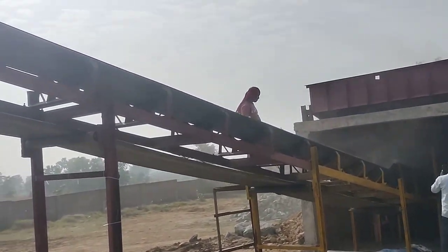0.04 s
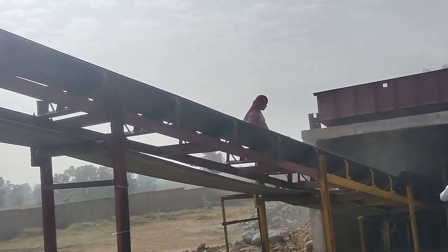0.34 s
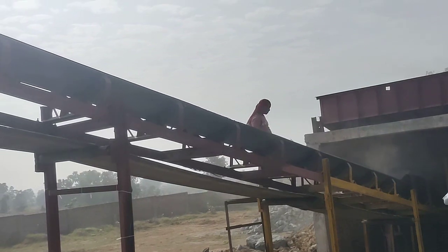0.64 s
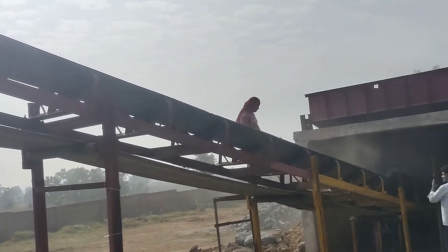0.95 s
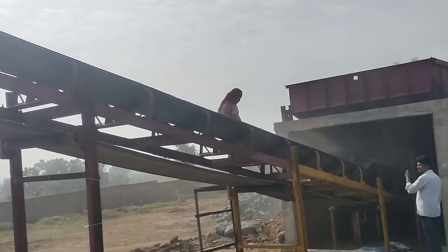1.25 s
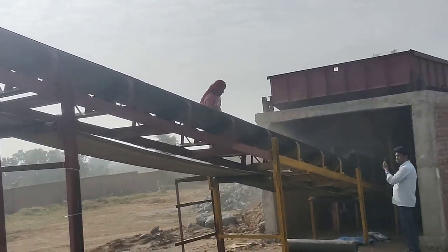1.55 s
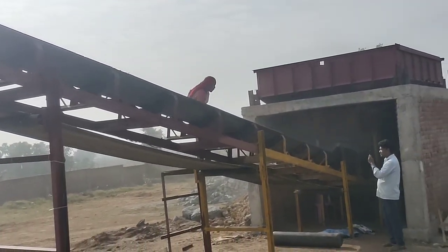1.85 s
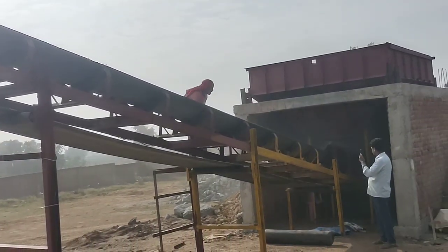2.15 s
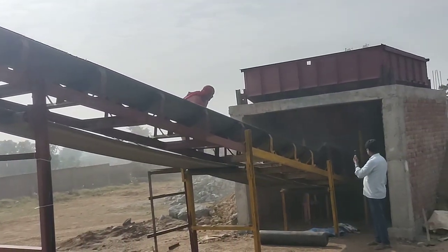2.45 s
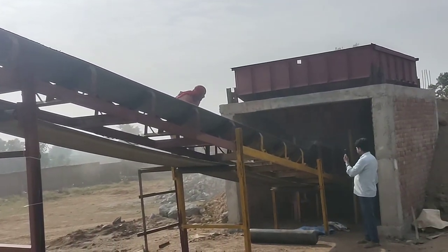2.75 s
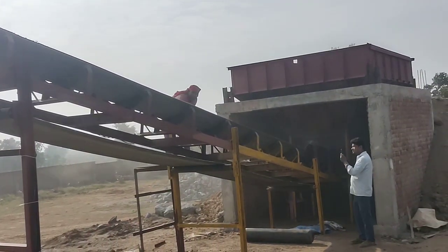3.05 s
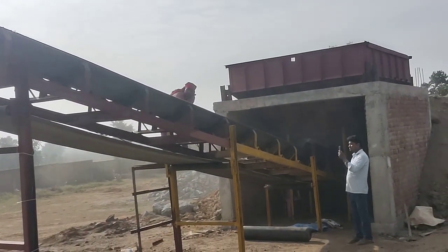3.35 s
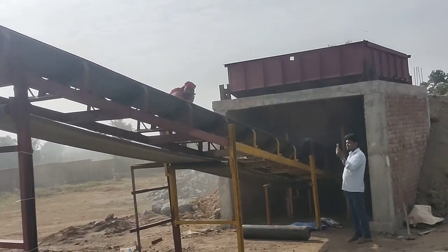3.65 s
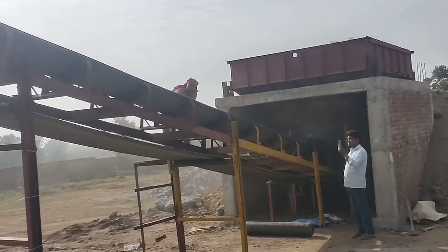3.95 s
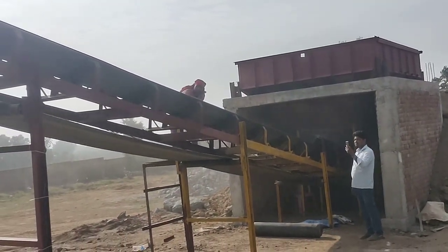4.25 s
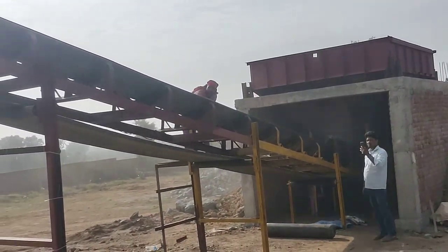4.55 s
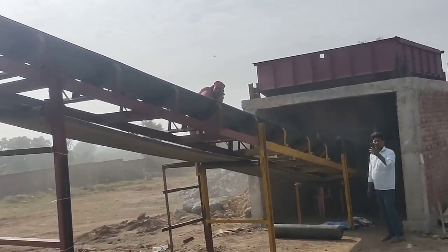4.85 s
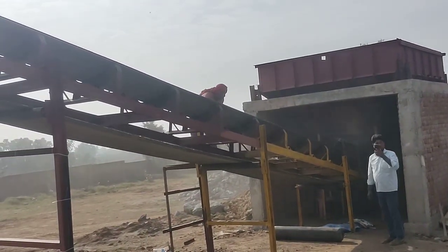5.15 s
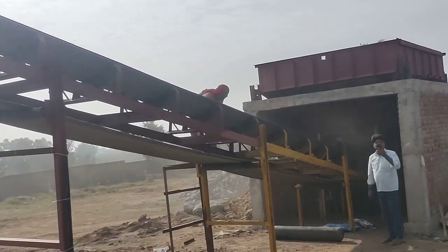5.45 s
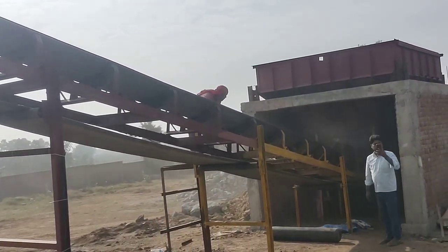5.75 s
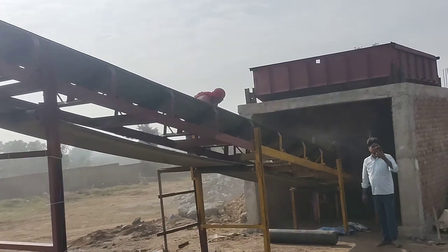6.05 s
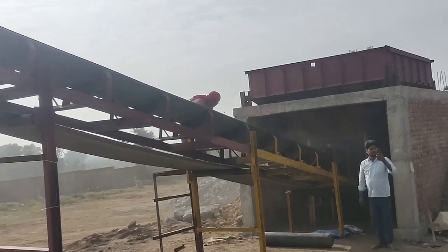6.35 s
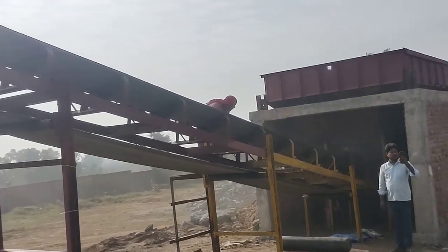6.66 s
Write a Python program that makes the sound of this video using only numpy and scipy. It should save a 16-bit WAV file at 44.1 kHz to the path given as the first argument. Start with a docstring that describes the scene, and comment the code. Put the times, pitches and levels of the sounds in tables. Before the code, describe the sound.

An outdoor stone crushing plant runs with a steady drive hum, distant machine rumble and grit hissing off a conveyor belt. Under a steel hopper, a tray strokes nearly three times a second. Each push sends stones thudding, tumbling and scraping over steel, followed by a thin, high roller squeak. A few heavier spills crunch down, and a metallic ring grows as the microphone turns toward it. A concrete bay adds a short echo.

```python
"""A stone crushing plant outdoors. From the start a drive hums, far machines rumble and grit hisses off
a belt. A tray under a steel hopper strokes back and forth 2.8 times a second. Each push makes stones
thud, tumble, grind, squeal and scrape over the steel. Then, as the tray turns round, they come to rest
and a dry roller squeaks. At about 1.5 seconds the first heavy spill crunches down, and a ring near
1.4 kHz comes through louder as the microphone turns toward it. A concrete bay adds its echo."""
import sys
import numpy as np
from scipy import signal
from scipy.fft import rfft, irfft, next_fast_len
from scipy.io import wavfile
from scipy.ndimage import uniform_filter1d

SR = 44100
rng = np.random.default_rng(int(sys.argv[2]) if len(sys.argv) > 2 else 0)


def digitize_waveform(pressure):
    """Quantize a signal to 16-bit integers and store it at the path in sys.argv[1].

    Rows of a 2-D input are taken as channels; values are limited to [-1, 1].
    """
    field = np.atleast_2d(pressure).T
    bounded = np.clip(field, -1, 1)
    quanta = np.round(bounded * 32767).astype(np.int16)
    wavfile.write(sys.argv[1], SR, quanta)


N = 295911
TIME = np.arange(N) / SR

# tones of the drive's hum: multiple of the shaft rate, level/dB, share that follows the load
HUM_TONES = [(3, -34, 0.3), (6, -40.5, 0.4), (8, -38, 0.44), (9, -38, 0.64), (10, -48.5, 0.3),
             (11, -61.5, 0.3), (13, -40.5, 0.9), (15, -48, 0.9), (18, -40.5, 1)]
# tone colour of the far machines: f/Hz, level/dB
FAR_SPECTRUM = [(20, -9), (45, 0), (90, 30), (200, 21), (480, -19), (900, -17), (1700, 20), (3000, -35),
                (6000, -18), (15000, -53)]
# tone colour of sliding grit: f/Hz, level/dB
GRIT_SPECTRUM = [(3000, -49), (4500, -4), (5400, 12), (5850, -5.5), (6300, 12), (6900, 6.5), (7600, 9.5),
                 (8500, 0), (9600, -0.5), (11500, 2.5), (13500, 6.5), (15500, 3)]
# pushes of the tray: t/s, length/s, lull before it/dB, thudding/dB, tumbling/dB, grinding/dB
TRAY_PUSHES = [(0.0, 0.19, -8.0, -29.5, -29.5, -22.5), (0.333, 0.21, -5.5, -28, -30, -21.5),
               (0.689, 0.22, -3, -32, -29, -22.5), (1.044, 0.22, -8, -29.0, -28.5, -24.5),
               (1.395, 0.23, -5.5, -27.5, -30.5, -28), (1.754, 0.21, -5, -29, -30, -27),
               (2.111, 0.23, -6.5, -29.5, -26.5, -26.5), (2.496, 0.19, -5.5, -26, -29.5, -24),
               (2.822, 0.24, -5, -31.5, -26.5, -24), (3.176, 0.23, -4, -27, -28.5, -24.5),
               (3.557, 0.219, -4.5, -27, -25.0, -23.5), (3.888, 0.236, -3, -32, -29, -22.5),
               (4.281, 0.216, -3.5, -27, -28.0, -23), (4.639, 0.199, -7.5, -27.5, -25.5, -23),
               (4.934, 0.25, -4.5, -27, -30, -23.5), (5.339, 0.24, -3, -31.0, -30.5, -24.5),
               (5.702, 0.21, -6, -25.5, -24.5, -23.0), (6.055, 0.33, -4.5, -28.5, -28, -21.5),
               (6.44, 0.34, -5.0, -25.5, -27.5, -22.5)]
# modes (the notes that a part rings at when hit): f/Hz, width/Hz, level/dB
HOPPER_MODES = [(119, 104, -7), (176, 140, -1.5), (256, 69, -0.5), (313, 21.5, -7), (366, 21.3, -1.5)]
CHUTE_MODES = [(530.5, 148, -11), (678, 62, -8), (771, 67, -5), (823, 53, -1), (944, 70.3, 2.5),
               (1019, 58, -6.5), (1069, 55, -19)]
TRAY_MODES = [(1610, 20.7, 2.5), (1677, 40.5, -1), (1750, 182, -4), (2044, 54, -6.5), (2233, 99, -0.5),
              (2384, 51, -8.5), (2590, 105, -2), (2755, 18, -8.5)]
LIP_MODES = [(1318, 51, -4), (1382, 21.5, -1.5), (1547, 124, -1)]
LINER_MODES = [(2960, 62, 3.5), (3353, 7.4, 4.5), (3448, 96, 10), (3532, 140, 4.5), (3840, 94, 1),
               (4030, 142, 3.5), (4210, 100, 4), (4456, 117, 2), (4777, 115, -17.5), (5005, 193, 0.5)]
CHIP_MODES = [(6940, 520, 1), (10020, 1700, 1), (12600, 2200, -9.5)]
ROLLER_MODES = [(4844, 7.4, 9), (4727, 13, 11), (4850, 41, -2.5), (10847, 24, -13.5)]
# the lip's ring, next to the grinding, comes through louder as the microphone turns to it: t/s, level/dB
MIC_FACING = [(0, -14.5), (1.1, -16), (1.8, -1.5), (3.7, -4.5), (6.7, -5.5)]
# heavy spills of stone: middle t/s, length/s, level/dB
STONE_SPILLS = [(1.478, 0.13, -22.5), (1.798, 0.1, -24), (2.157, 0.057, -50), (2.897, .1, -29.5),
                (4.752, 0.1, -29), (4.993, 0.087, -22.5), (5.738, 0.083, -42)]
# single stones squealing on the steel: middle t/s, f/Hz, level/dB, length/s
STONE_SQUEALS = [(.04, 2857, -23, 0.3), (.35, 2813, -22, .071), (.4, 13500, -20.5, 0.019),
                 (.58, 980, -23.5, 0.084), (.76, 843, -23, .17), (1.13, 3480, -28, .09),
                 (1.74, 1366, -26, 0.073), (1.81, 2590, -20, .063), (2.15, 929, -27.5, .14),
                 (2.28, 842, -25, 0.19), (2.55, 3574, -24, 0.11), (2.95, 2595, -22, .057),
                 (3.19, 2576, -19.5, 0.035), (3.27, 3250, -23, 0.078), (3.42, 2574, -22.5, 0.067),
                 (3.77, 1356, -19, 0.049), (4.33, 12600, -28, 0.053), (4.54, 12700, -21, .025),
                 (4.8, 2570, -23, 0.064), (4.84, 3797, -18, 0.036), (5.06, 3450, -27, 0.034),
                 (5.226, 8780, -20.5, 0.037), (5.73, 13300, -18.5, 0.03), (5.74, 4150, -20.5, 0.025),
                 (6.1, 13700, -21, .04), (6.44, 3510, -22, 0.076)]
# the load scraping over the steel liner at full speed: middle t/s, length/s, level/dB
LINER_SCRAPES = [(0.099, 0.081, -23.5), (0.463, 0.152, -26.0), (0.783, 0.134, -24.0), (1.14, 0.133, -22.0),
                 (1.532, 0.066, -26.0), (1.859, 0.089, -20.5), (2.206, 0.109, -21.5), (2.57, 0.128, -22.0),
                 (2.928, 0.141, -22.5), (3.284, 0.106, -21.5), (3.665, 0.073, -25.5), (4.023, 0.138, -24.5),
                 (4.333, 0.178, -22.5), (4.715, 0.074, -26.0), (5.064, 0.095, -22.0), (5.407, 0.12, -21.5),
                 (5.779, 0.104, -24.0), (6.145, 0.081, -21.5), (6.3, 0.06, -23.5), (6.467, 0.159, -21.5),
                 (6.7, 0.07, -27)]
# the roller's whistle catching before the turn: middle t/s, f/Hz, level/dB, length/s
EARLY_CATCHES = [(.149, 11120, -17.5, 0.021), (.504, 10620, -17.5, 0.013)]
# turns of the tray, each with a squeak:
# t/s, length/s, start f/Hz, end f/Hz, whistle/dB, chirp before/dB, chirp after/dB, jolt/dB
TRAY_TURNS = [(0.197, 0.067, 10960, 10950, -13, -18.5, -26, -50),
              (0.543, 0.074, 10970, 11160, -15.5, -27, -33.5, -31),
              (0.905, .082, 11240, 11030, -11, -17.5, -29, -32.5),
              (1.272, 0.055, 10980, 11160, -9.5, -24.5, -26.5, -50),
              (1.614, 0.066, 11060, 11000, -13.5, -14.5, -28.5, -33),
              (1.973, 0.077, 10950, 11540, -12.5, -19, -33, -36),
              (2.333, 0.06, 10730, 11480, -14, -17, -26, -31),
              (2.687, 0.068, 10940, 11240, -16, -23.5, -44, -34),
              (3.04, 0.072, 11030, 11130, -14.5, -47, -42, -52),
              (3.41, 0.059, 10900, 10850, -15, -53, -31.5, -58),
              (3.762, 0.064, 10800, 10860, -25, -20.5, -34, -50),
              (4.109, 0.077, 10900, 11130, -20, -47, -39.5, -37),
              (4.479, 0.06, 10900, 12900, -14, -51, -37.5, -57),
              (4.846, 0.031, 10800, 10400, -16, -38, -39, -32),
              (5.175, 0.083, 11020, 10830, -14.5, -55, -29, -33.5),
              (5.535, 0.073, 10860, 11400, -16, -37, -47, -34),
              (5.907, 0.048, 11130, 12100, -13, -55, -34, -34.5)]

SHAFT_HZ, MOTOR_HZ, TOP_HZ = 20.35, 39, 15750
JOLT_DELAY_S = 0.096  # the load jolts on the liner this long after a turn


def undb(db):
    """Turn decibels into a number to multiply by."""
    return np.exp(np.asarray(db) * np.log(10) / 20)


def unit(x):
    """Scale to an average power of 1."""
    return x / np.sqrt(np.mean(x ** 2) + 1e-18)


def even(x, seconds):
    """Hold the average power at 1 over the given time, keeping the finer grain."""
    return x / np.sqrt(uniform_filter1d(x ** 2, int(seconds * SR)) + 1e-9)


def walk(rate):
    """A smooth random wobble of size 1 that changes about rate times a second."""
    step = max(int(SR / rate), 2)
    held = np.repeat(rng.standard_normal(N // step + 2), step)
    return unit(uniform_filter1d(held, step)[step // 2:step // 2 + N])


def lumpy(rate):
    """A random wobble kept between -1 and 1."""
    return np.tanh(walk(rate))


def curve(rows):
    """Join (time, value) points with straight lines."""
    return np.interp(TIME, *np.transpose(rows))


def bump(t, width):
    """A smooth swell around t = 0."""
    return np.exp(-(t / width) ** 2)


def phase(hz):
    """The running angle, in radians, of a tone whose pitch moves."""
    return 2 * np.pi * np.cumsum(hz) / SR


def colour(x, spectrum):
    """Make each frequency louder or softer, as the spectrum says."""
    hz, db = np.transpose(spectrum)
    size = next_fast_len(N + 4096)
    f = np.fft.rfftfreq(size, 1 / SR) + 1
    gain = undb(np.interp(np.log(f), np.log(hz), db))
    return irfft(rfft(x, size) * gain, size)[:N]


def band(x, low_hz, high_hz):
    """Keep the sound between two frequencies."""
    return signal.sosfilt(signal.butter(3, [low_hz, high_hz], "band", fs=SR, output="sos"), x + 1e-18)


def bay(x, fade_s, echo_db):
    """Add the dense echo of the concrete walls and the steel frame."""
    t = TIME[:SR // 2]
    tail = rng.standard_normal(len(t)) * undb(-60 * t / fade_s) * (t > .003)
    return x + undb(echo_db) * signal.fftconvolve(x, tail / np.linalg.norm(tail))[:N]


def contacts(rate, spread_db):
    """About rate random stone hits a second, many light and a few hard."""
    hit = rng.random(N) < rate / SR
    size = np.minimum(rng.standard_exponential(N), 4)
    return hit * undb(spread_db * size)


def stroke_clock():
    """Seconds since the tray last turned round."""
    turns = np.array(TRAY_TURNS)[:, 0]
    gap_s = 0.288  # spaces one more turn before the listed ones and two after
    turns = np.r_[turns[0] - gap_s, turns, turns[-1] + gap_s * np.arange(1, 3)]
    return TIME - turns[np.searchsorted(turns, TIME, side="right") - 1]


def drive(load_db):
    """The motor and shaft hum; the upper tones are frame buzz that swells with the load."""
    angle = phase(SHAFT_HZ * (1 + 0.0016 * walk(1.953)))
    hum = undb(-52) * np.sin(2 * np.pi * MOTOR_HZ * TIME)
    for multiple, db, share in HUM_TONES:
        gain = undb(db + share * (load_db + 1.8 * walk(18)))
        hum += gain * np.sin(multiple * angle + 2 * np.pi * rng.random() + 0.57 * share * walk(9))
    return np.sqrt(2) * hum


def far_machines():
    """Machines further off make a gently wavering rumble."""
    return undb(-43 + walk(2.3)) * unit(colour(rng.standard_normal(N), FAR_SPECTRUM))


def belt_grit(clock):
    """Grit pours evenly off the belt: a steady fine hiss that dips briefly at each squeak."""
    dip = bump(clock - .03, .035)
    grains = contacts(9000, 1.8) * rng.standard_normal(N)
    return undb(-35.5 - 3.4 * dip + 0.28 * walk(23)) * unit(colour(grains, GRIT_SPECTRUM))


def pushed(push_db, lull_scale):
    """Level in dB: rises out of a lull, holds through each push, settles into the next lull."""
    start, length, lull_db = np.array(TRAY_PUSHES).T[:3]
    stop = start + length
    before = lull_scale * np.minimum(lull_db, 0)
    after = np.r_[before[1:], before[-1]]
    rise_s, settle_s = .05, 0.032
    times = np.c_[start - rise_s, start, stop, stop + settle_s].ravel()
    levels = np.c_[push_db + before, push_db, push_db, push_db + after].ravel()
    return np.interp(TIME, np.maximum.accumulate(times), levels)


def load_levels(clock):
    """Thudding, tumbling and grinding in dB: stones come in lumps and lie stillest just after a turn."""
    start, _, _, thud_db, tumble_db, grind_db = np.array(TRAY_PUSHES).T
    surge = sum(bump(TIME - s - 0.022, 0.012) for s in start)  # the first to topple tumble hardest
    surge_db = 2.5 * (surge - surge.mean())
    still_db = -3.5 * bump(clock - 0.085, 0.025)
    lumps = lumpy(22)
    return (pushed(thud_db, lull_scale=2.13) + still_db + 2.25 * lumps + 2.6 * lumpy(35),
            pushed(tumble_db, lull_scale=1.45) + still_db + surge_db + lumps + lumpy(20),
            pushed(grind_db, lull_scale=1) + still_db / 2 + 1.2 * lumps + 1.9 * lumpy(9))


def ring(blows, modes, swell_db):
    """A plate rings: each blow lands somewhere else, and each mode swells and fades as stones shift."""
    out, hits = 0, np.flatnonzero(blows)
    shift_times = np.arange(0, 7, .06)
    for hz, width, db in modes:
        swell = np.interp(TIME[hits], shift_times, rng.standard_normal(len(shift_times)))
        landing = rng.standard_normal(4096)[hits % 4096]
        force = np.full(N, 1e-18)
        force[hits] = blows[hits] * landing * undb(swell_db * swell)
        peak = np.concatenate(signal.iirpeak(hz, hz / (1.81 * width), fs=SR))
        out = out + undb(db) * unit(signal.sosfilt([peak, peak], force))
    return unit(out)


def slips(modes, count, spread_db, decay_s, scatter):
    """Short sinking tones: a stone chatters near one of the plate's modes, then slips free."""
    t = TIME[:SR // 8].astype(np.float32)
    shape = (1 - np.exp(-t / 0.00065)) * np.exp(-t / decay_s) * (1 - t / t[-1])
    sweep = 2 * np.pi * (t - 0.117 * t ** 2)
    when, which = rng.random((count, 2)).T
    detune, size = rng.standard_normal((count, 2)).T
    hz, width, db = np.array(modes, float)[(which * len(modes)).astype(int)].T
    pitches = hz + scatter * width * detune
    gains = undb(db + spread_db * np.minimum(size, 2))
    out = np.zeros(N + len(t), np.float32)
    for at, pitch, gain in zip((when * N).astype(int), pitches, gains):
        out[at:at + len(t)] += float(gain) * shape * np.sin(float(pitch) * sweep)
    return unit(out[:N])


def stones(thud_db, tumble_db, grind_db):
    """Big stones thud in the shaking hopper; smaller ones tumble in the chute and grind on the tray."""
    shaft_angle = 2 * np.pi * SHAFT_HZ * TIME
    shake = 1 + 0.075 * np.sin(shaft_angle) + 1.36 * np.sin(2 * shaft_angle)
    thud = band(ring(shake * contacts(400, 4.8), HOPPER_MODES, swell_db=3.3), 112, 406)
    tumble = ring(contacts(900, 4.3), CHUTE_MODES, swell_db=9.2)
    tumble += undb(-6) * slips(CHUTE_MODES, count=400, spread_db=7, decay_s=0.11, scatter=0.556)
    grind = ring(contacts(1100, 4), TRAY_MODES, swell_db=8.2)
    grind += undb(-4) * slips(TRAY_MODES, count=750, spread_db=2, decay_s=0.23, scatter=0.543)
    lip = undb(curve(MIC_FACING)) * ring(contacts(900, 2.75), LIP_MODES, swell_db=0.97)
    return (undb(thud_db - 2.5) * even(thud, 0.059)
            + undb(tumble_db + 0.5) * even(tumble, 0.081)
            + undb(grind_db - 1) * (even(grind, 0.083) + lip))


def crunch(tumble_db):
    """Stones crack together: lightly as they tumble, hard in a spill, hardly at all in the lulls."""
    hits = contacts(1100, 3.9) * rng.standard_normal(N)
    cracks = even(band(bay(hits, fade_s=0.083, echo_db=1.1), 464, 1620), 0.047)
    spills = sum(undb(db) * bump(TIME - s, length / 2) for s, length, db in STONE_SPILLS)
    facing_db = curve(MIC_FACING)
    lull_db = np.minimum(tumble_db - np.median(tumble_db), 0)
    light = undb(-12.5 + tumble_db + lull_db + 0.52 * (facing_db - facing_db.mean()))
    return np.hypot(light, spills) * cracks


def chirps(rows, sink, rough, overtone_db):
    """Tones made by sticking and slipping; sink is the share of its pitch that one loses per second."""
    out, jitter = np.zeros(N), rough * walk(600)
    for middle, hz, db, length in rows:
        on = np.flatnonzero(np.abs(TIME - middle) < length / 2)
        t = TIME[on] - middle
        angle = phase(hz * (1 - sink * t + jitter[on]))
        overtones = sum(np.sin(k * angle) for k in range(2, 5) if k * hz < TOP_HZ)
        shape = np.sin(np.pi * (t / length + .5) ** 0.62)  # quick rise, slower fade
        out[on] += undb(db) * np.sqrt(2) * shape * (np.sin(angle) + undb(overtone_db) * overtones)
    return out


def squeals():
    """Every scrape sings on the liner at its own pitch, and now and then a single stone squeals."""
    pitches = 3423 + 61.1 * rng.standard_normal(len(LINER_SCRAPES))
    notes = [(s, hz, db, .8 * length) for (s, length, db), hz in zip(LINER_SCRAPES, pitches)]
    sung = chirps(notes, sink=0.723, rough=0.0215, overtone_db=-15)
    single = chirps(STONE_SQUEALS, sink=0.354, rough=0.015, overtone_db=-22.5)
    return undb(-3.5) * bay(sung + single, fade_s=0.27, echo_db=-1.1)


def scrape_level(clock):
    """The rasp in dB: a swell for each scrape, a jolt after a turn, light drag that dips at the turn."""
    swells = sum(undb(db) * bump(TIME - s, length / 2) for s, length, db in LINER_SCRAPES)
    jolts = sum(undb(db) * bump(TIME - s - JOLT_DELAY_S, 0.033) for s, *_, db in TRAY_TURNS)
    drag = undb(-35 - 20 * bump(clock - .025, 0.015))
    judder_db = 2.2 * lumpy(40)
    return 10 * np.log10(swells ** 2 + drag ** 2 + jolts ** 2) + judder_db


def scrape(clock):
    """Stones rasp over the liner; at mid-stroke grit sprays hardest and small chips sing."""
    gain = undb(scrape_level(clock))
    mid_stroke = bump(clock - .22, 0.037)
    rasp = bay(ring(contacts(2400, 3.8), LINER_MODES, swell_db=11.7), fade_s=0.11, echo_db=0)
    rasp += undb(1) * slips(LINER_MODES, count=1400, spread_db=9, decay_s=0.019, scatter=0.697)
    grains = contacts(5000, 3) * rng.standard_normal(N)
    spray = unit(bay(colour(grains, GRIT_SPECTRUM), fade_s=0.11, echo_db=2.3))
    chips = slips(CHIP_MODES, count=5000, spread_db=4, decay_s=0.023, scatter=0.49)
    return gain * (undb(-2.5) * even(rasp, 0.044)
                   + (undb(-19.5) + undb(-13) * mid_stroke) * spray
                   + (undb(-15) + undb(-11.5) * mid_stroke) * even(chips, 0.088))


def whistle():
    """The roller's whistle starts hard, sinks as it speeds up, then gets rough and flicks up to let go."""
    hz, gain, rough = np.full(N, 11000.), np.zeros(N), np.zeros(N)
    release_db = -18
    for start, length, start_hz, end_hz, start_db, *_ in TRAY_TURNS:
        low_hz = 10380 + 150 * rng.standard_normal()
        progress = (TIME - start) / length
        on = (progress > 0) & (progress < 1)
        progress = progress[on]
        hz[on] = np.interp(progress, [0, .62, .76, .94], [start_hz + 90, low_hz - 60, low_hz, end_hz])
        fade = np.clip(np.minimum(progress / 0.037, (1 - progress) / 0.014), 0, 1)
        gain[on] = undb(np.interp(progress, [.15, .42], [start_db, release_db])) * fade
        rough[on] = np.interp(progress, [.4, .7], [.35, 1])
    angle = phase(hz + rough * (130 * walk(1500) + 80 * walk(200)))
    # the chattering axle adds faint side tones below the whistle
    sides = np.sin(angle - phase(850 + 90 * walk(400)))
    sides += undb(-1) * np.sin(angle - phase(1650 + 150 * walk(360)))
    return undb(1 + 3.3 * lumpy(220)) * gain * (np.sin(angle) + undb(-29) * rough ** 2 * sides)


def roller():
    """The dry roller chirps before the turn, whistles on it and gives a hoarse two-note squeal after."""
    before = chirps([(s - .058, 5235, db, .026) for s, *_, db, _, _ in TRAY_TURNS],
                    sink=.6, rough=.025, overtone_db=-12.5)
    after = chirps([(s + 0.0619, 4850, db, .06) for s, *_, db, _ in TRAY_TURNS],
                   sink=0.92, rough=0.023, overtone_db=-9)
    jolt = chirps([(s + JOLT_DELAY_S, 3570, db - 0.5, .07) for s, *_, db in TRAY_TURNS],
                  sink=0.037, rough=.02, overtone_db=-22)
    rub = whistle() + before + undb(-1) * after + jolt
    rub += chirps(EARLY_CATCHES, sink=-4.1, rough=0.013, overtone_db=-30)
    ringing = sum(undb(db) * signal.lfilter(*signal.iirpeak(hz, hz / width, fs=SR), rub + 1e-18)
                  for hz, width, db in ROLLER_MODES)
    return bay(rub + ringing, fade_s=0.18, echo_db=-3.5)


def scene():
    """Add the stones on the tray, the roller, the drive, the grit and the far machines together."""
    clock = stroke_clock()
    thud_db, tumble_db, grind_db = load_levels(clock)
    feeder = stones(thud_db, tumble_db, grind_db) + crunch(tumble_db) + scrape(clock) + squeals()
    load_db = thud_db - np.median(thud_db)
    return (feeder + roller() + drive(load_db) + belt_grit(clock) + far_machines())[None]


def record(dry):
    """Cut away the highest treble."""
    return signal.sosfilt(signal.ellip(10, .2, 70, TOP_HZ, fs=SR, output="sos"), dry)


dry = scene()
out = record(dry)
digitize_waveform(out)
```